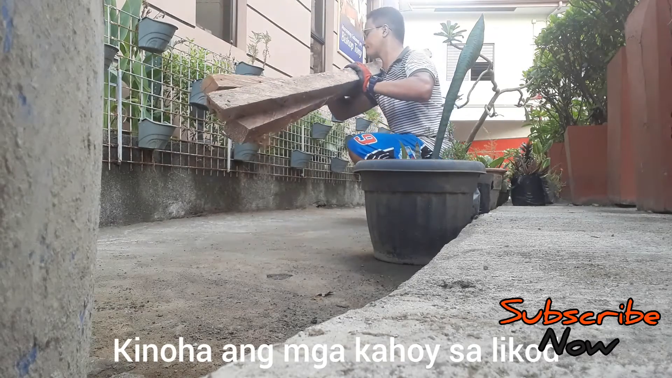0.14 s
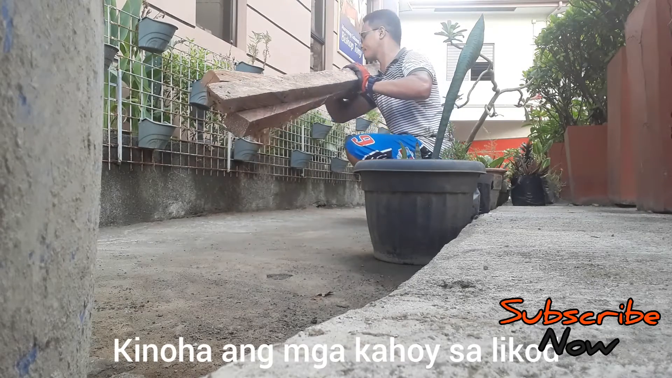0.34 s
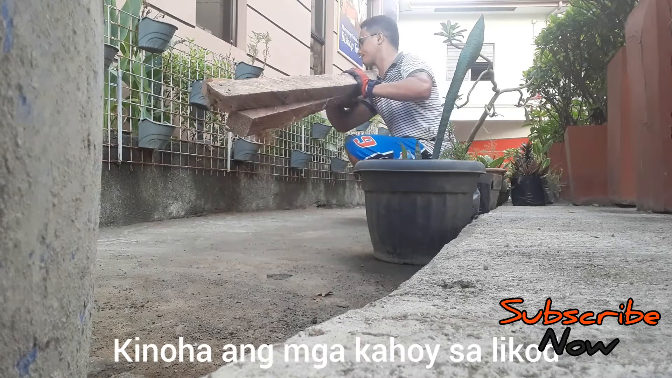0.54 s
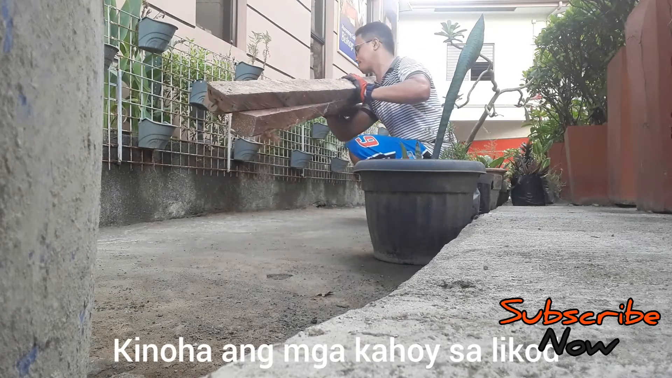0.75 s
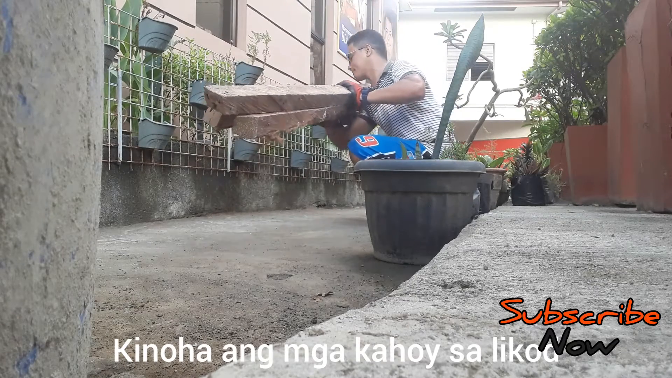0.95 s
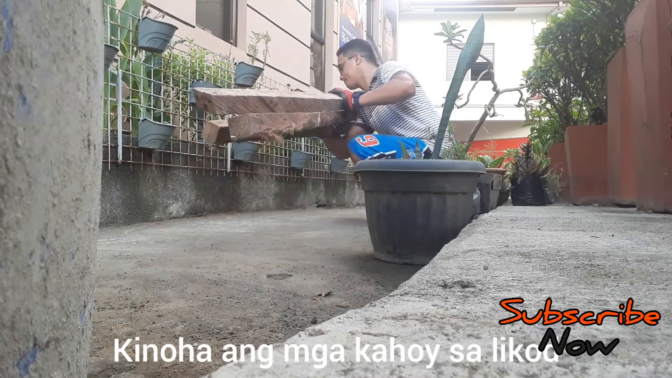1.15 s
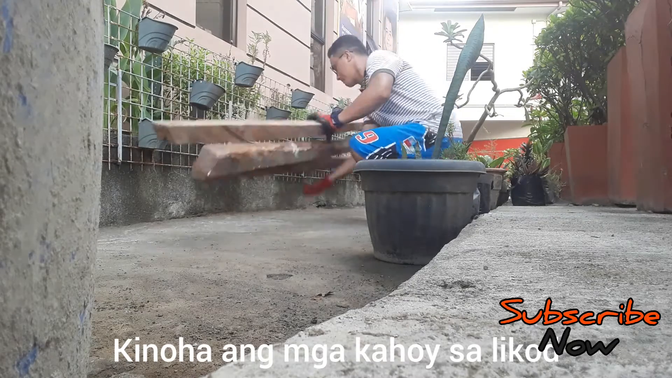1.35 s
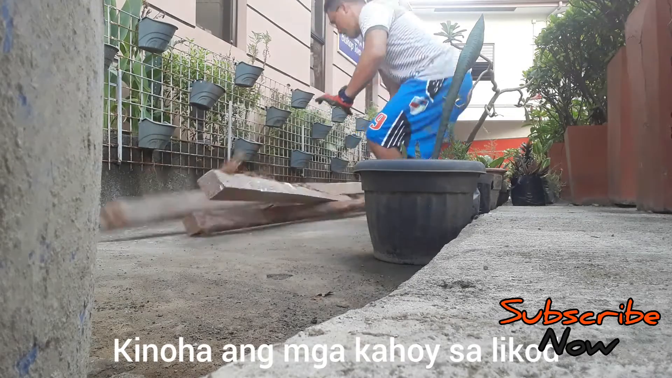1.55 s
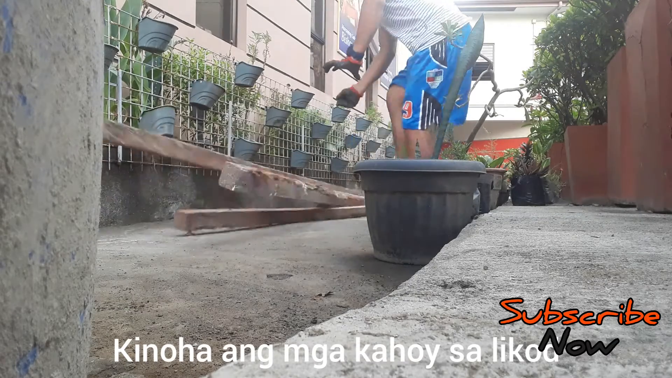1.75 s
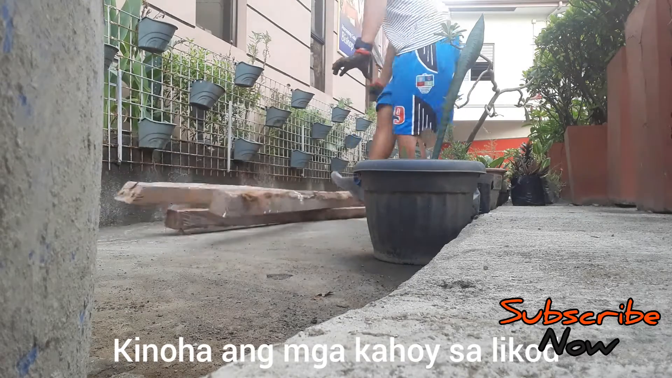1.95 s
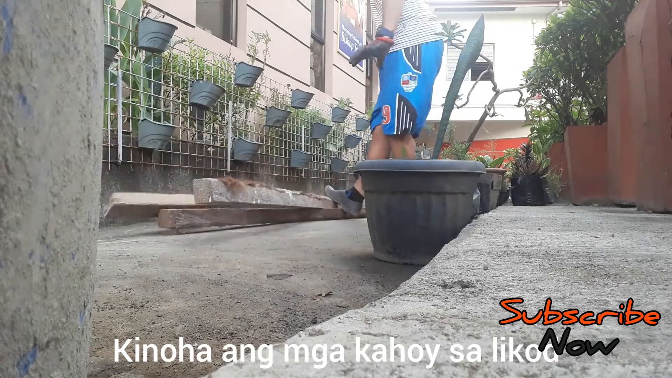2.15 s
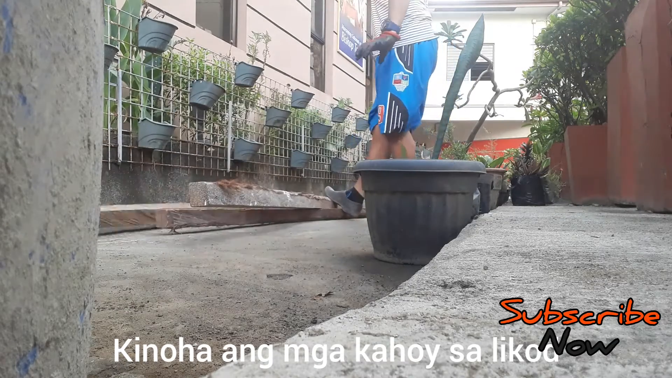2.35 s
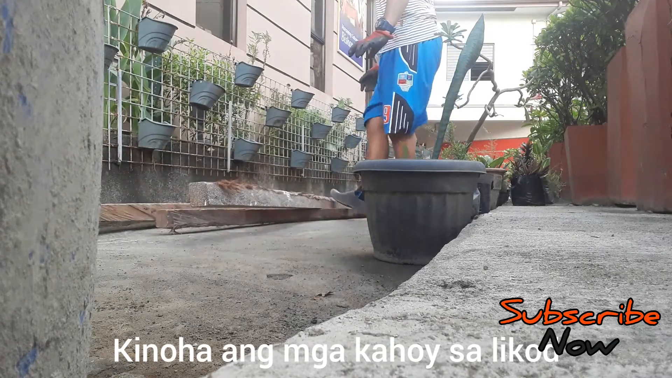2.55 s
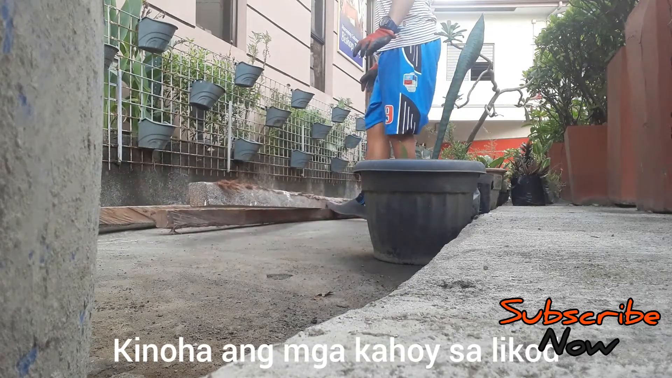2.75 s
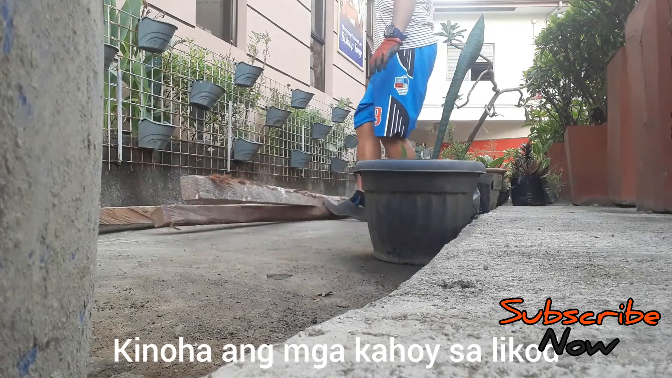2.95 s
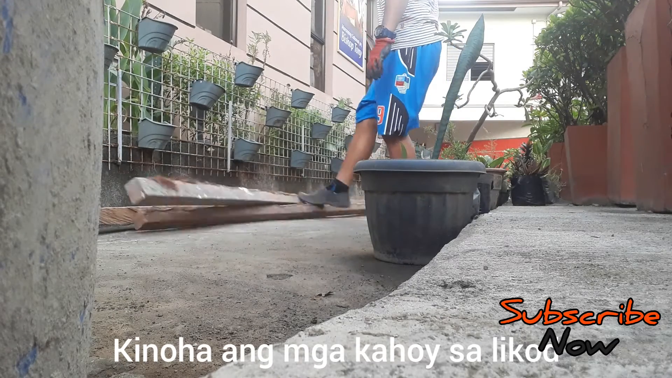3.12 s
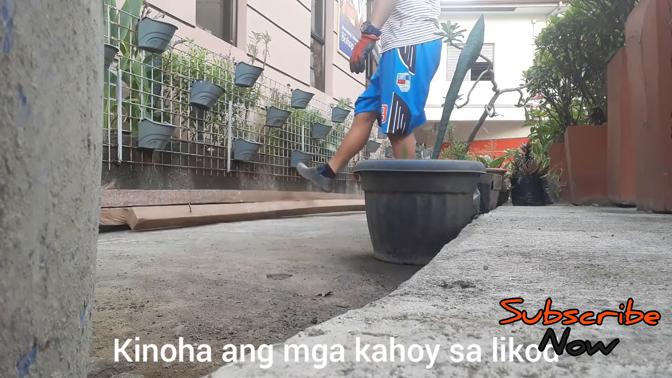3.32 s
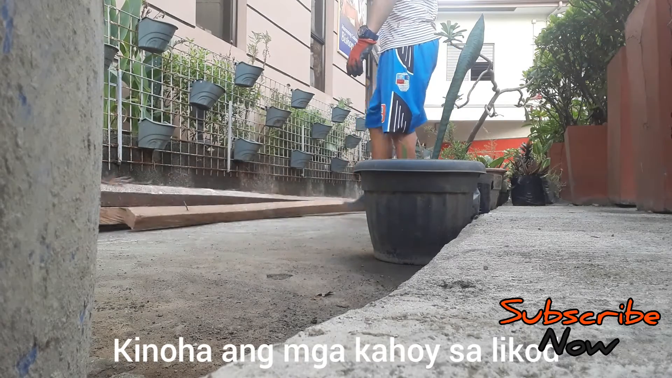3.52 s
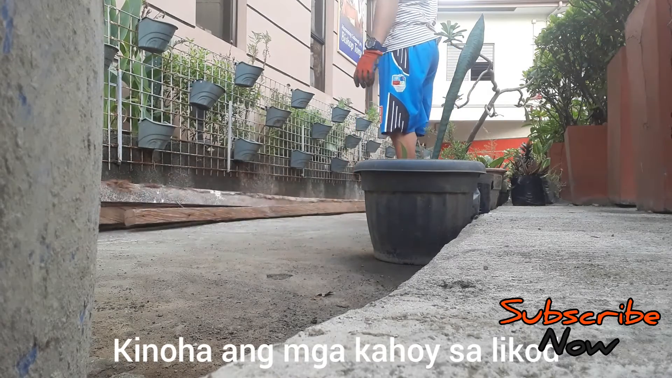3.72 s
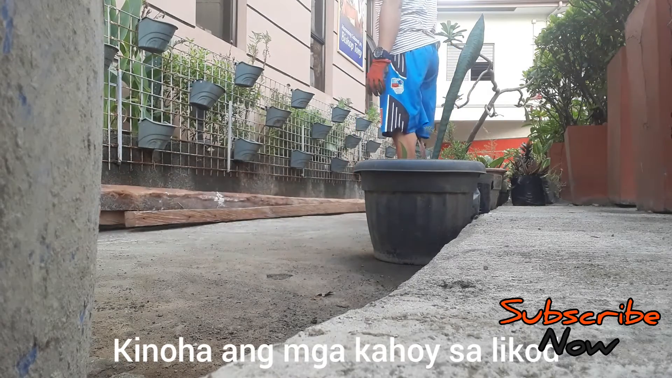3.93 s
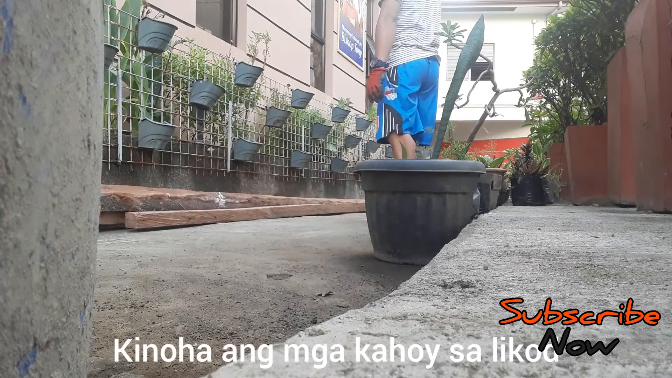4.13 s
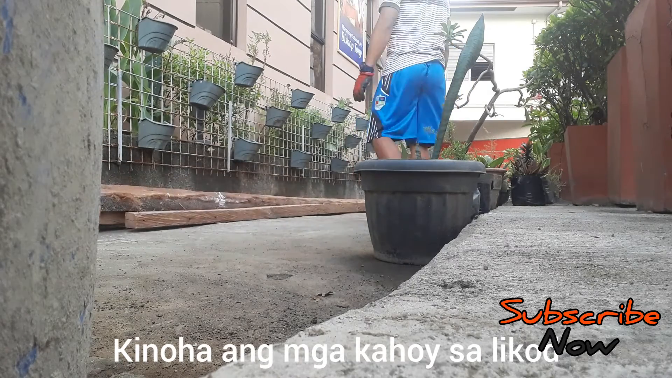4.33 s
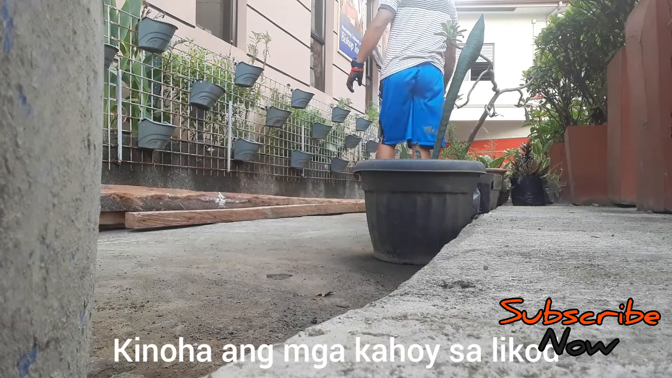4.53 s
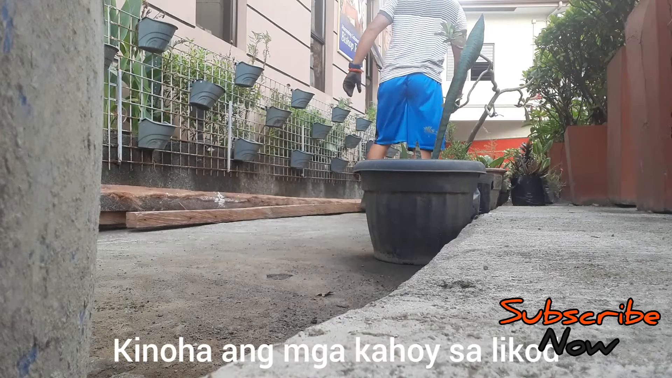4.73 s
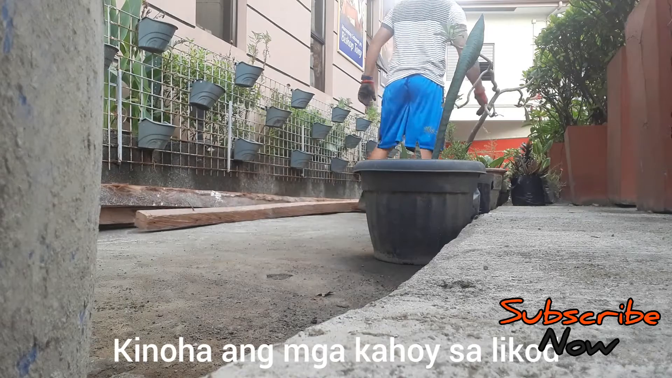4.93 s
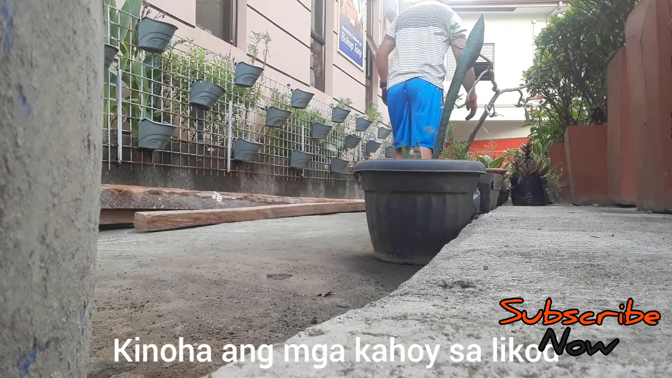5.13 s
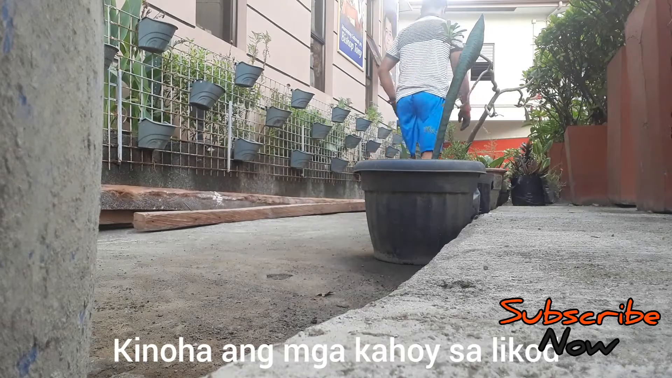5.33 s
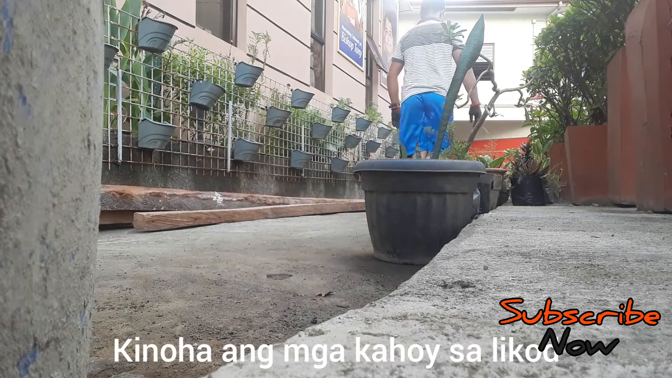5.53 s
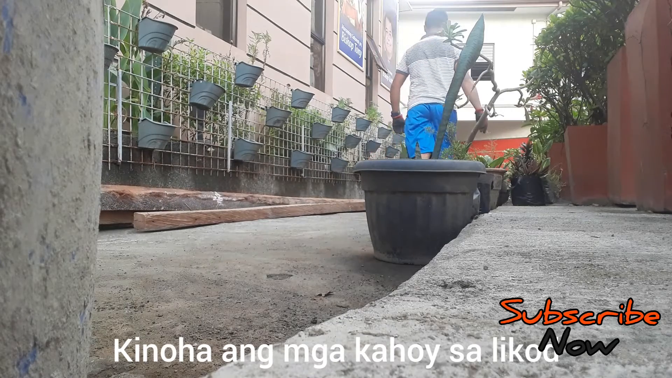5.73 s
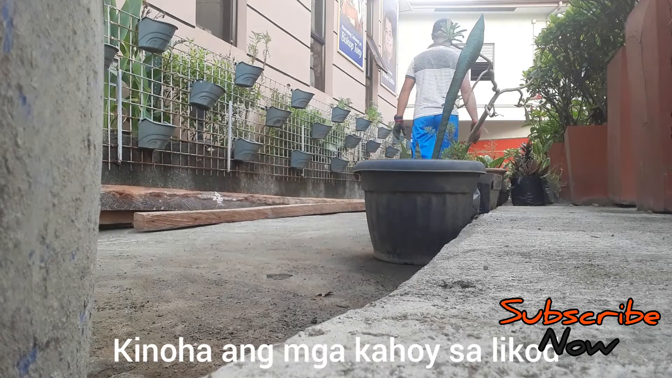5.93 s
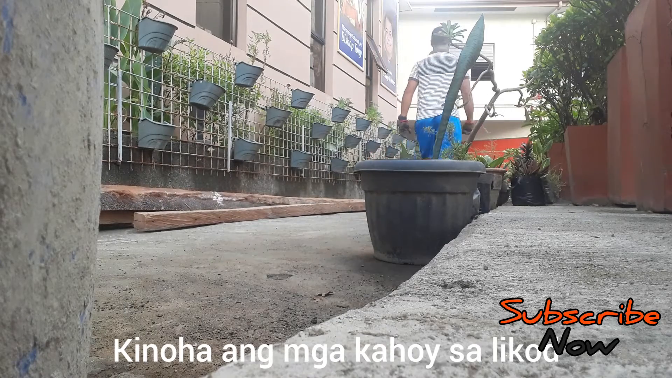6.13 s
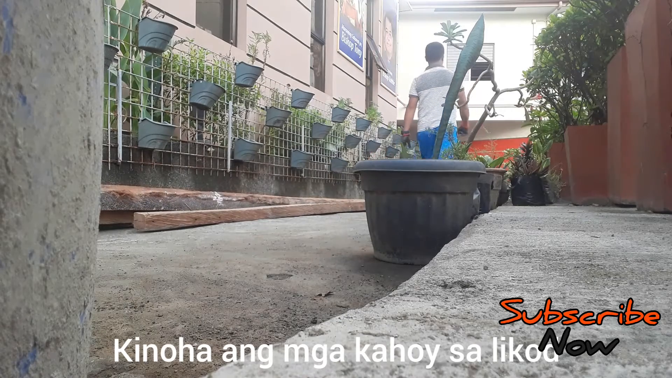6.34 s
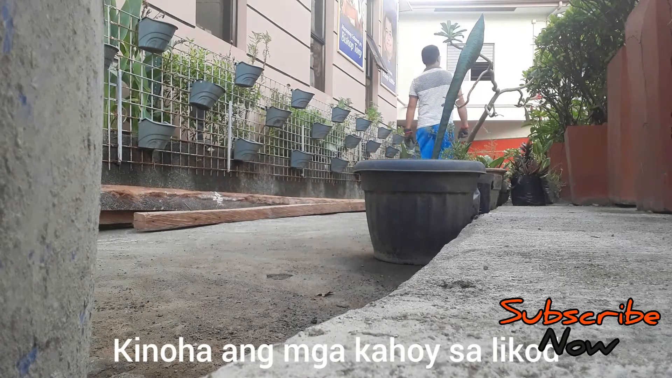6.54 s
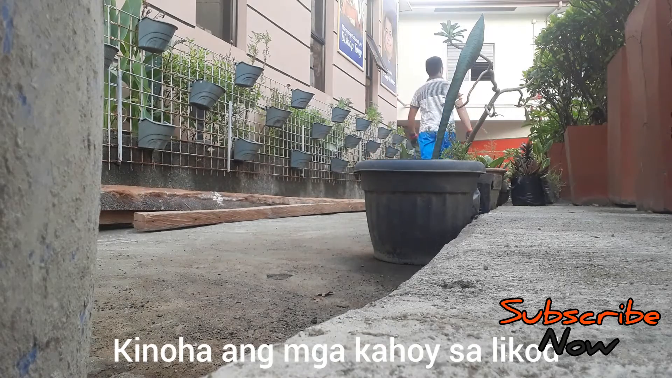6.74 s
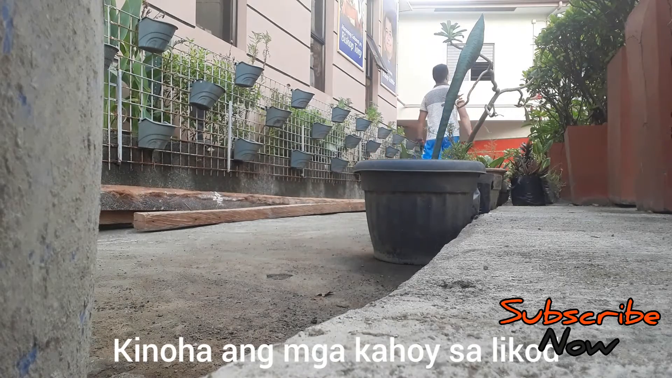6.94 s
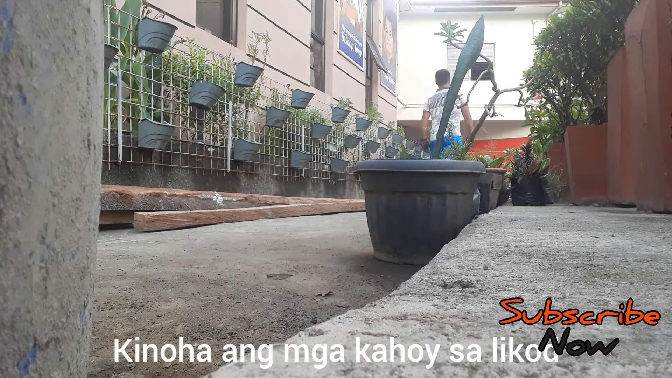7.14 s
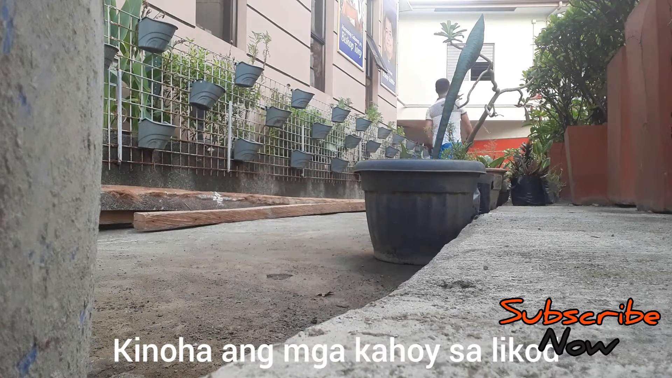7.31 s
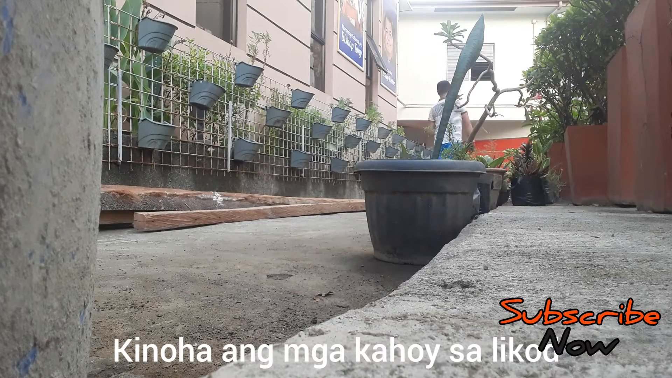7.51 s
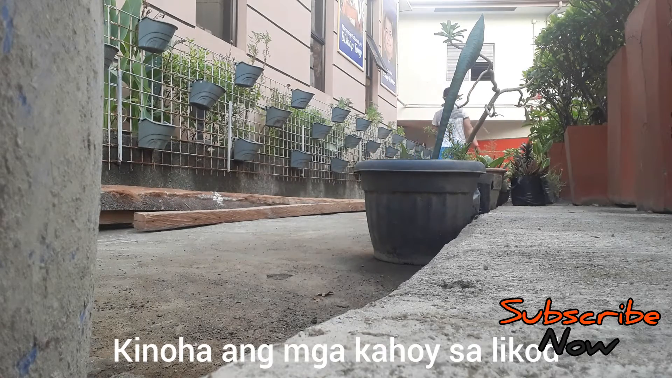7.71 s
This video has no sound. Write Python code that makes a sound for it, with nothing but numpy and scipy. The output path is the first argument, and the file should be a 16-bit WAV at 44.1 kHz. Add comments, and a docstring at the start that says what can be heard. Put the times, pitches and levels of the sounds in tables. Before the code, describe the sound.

For the first 1.4 s there is only a low outdoor murmur, a faint wavering hum near 157 Hz and slight treble hiss and grit. At 1.5-1.7 s wooden planks drop on concrete: a very loud cluster of thuds and bright cracks with a low puff of air and crunching sand. Separate knocks and bounces follow until 2.35 s, fading to small ticks by 2.8 s. From 3.13 to 3.6 s a foot shoves the stack: rapid, dry, mid-pitched knocks, two tiny rough squeaks around 3.25 s and grit. More knocks and a sandy slip at 3.7-3.8 s die by 4 s. At 4.75-5.05 s a hollow object judders and scrapes, quieter, with weaker catches until 5.45 s. Then faint grit, hum returning near 6.3 s, a very faint falling chirp at 7.07 s, and murmur to the end. Short ring from close walls.

```python
"""In a narrow garden passage, wooden planks drop on concrete, bounce and settle; a foot shoves them again.
Struck wood is sums of decaying modes; sand slides under it and two planks squeak as a rough sine.
Then something hollow judders over the floor: modal knocks plus clicks that rattle its body and grind sand.
Grit and a swelling treble hiss are filtered clicks, a faint falling chirp is a swept sine, the walls ring
briefly, and behind it all lie a rumble of coloured noise and a low wavering hum of three harmonics."""
import sys
import numpy as np
from scipy import signal
from scipy.fft import rfft, irfft
from scipy.io import wavfile

SR = 44100
rng = np.random.default_rng(int(sys.argv[2]) if len(sys.argv) > 2 else 0)


def persist_wave(psi):
    """Save psi, clipped to +-1, as 16-bit WAV."""
    counts = np.round(np.clip(psi, -1, 1) * 32767).astype(np.int16)
    wavfile.write(sys.argv[1], SR, np.atleast_2d(counts).T)


N = 342657
TIME = np.arange(N) / SR

# edges of the thud, body, clack, crack and splinter registers of a blow: frequency [Hz]
REGISTER_EDGES = [130, 300, 620, 1080, 2250, 3800]


def amp(db):
    """Decibels to gain."""
    return 10 ** (np.asarray(db) / 20)


def unit(x):
    """Scales to rms 1."""
    return x / np.sqrt(np.mean(x ** 2) + 1e-20)


def read(points, hz):
    """Reads a table of (frequency, value) over log frequency."""
    f, value = np.transpose(points)
    return np.interp(np.log(hz + 1), np.log(f), value)


def level(curve):
    """Gain over the whole scene from rows of (time [s], level [dB]), silent outside them."""
    return amp(np.interp(TIME, *np.transpose(curve), left=-np.inf, right=-np.inf))


def add(mix, s, sound):
    """Mixes a sound in at time s."""
    part = mix[round(s * SR):][:len(sound)]
    part += sound[:len(part)]


def band(x, lo_hz, hi_hz, order=3):
    """Causal Butterworth band-pass."""
    edges_hz = [lo_hz, min(hi_hz, SR / 2 - 1)]
    return signal.sosfilt(signal.butter(order, edges_hz, 'band', fs=SR, output='sos'), x)


def colour(x, tone, size=4096):
    """Causal minimum-phase filter with the given spectrum."""
    hz = abs(np.fft.fftfreq(size, 1 / SR))
    log_gain = np.log(amp(np.maximum(read(tone, hz), -100)))
    # the Hilbert transform of the log gain supplies the minimum phase
    taps = np.fft.ifft(np.exp(np.conj(signal.hilbert(log_gain)))).real
    return signal.oaconvolve(x, taps[:size // 2])[:len(x)]


def drift(per_s):
    """Random wander of rms 1: noise that fades out above about per_s cycles a second."""
    keep = np.exp(-(np.fft.rfftfreq(N, 1 / SR) / per_s) ** 2)
    return unit(irfft(rfft(rng.standard_normal(N)) * keep, N))


def grains(count, per_s, spread_db):
    """Sparse clicks of very unequal size and random sign."""
    size = amp(spread_db * np.minimum(rng.exponential(1, count), 4))
    size *= rng.choice([-1, 1], count)
    return size * (rng.random(count) < per_s / SR)


def strokes(rows, attack_s, release_t60, slope_db_per_s=0):
    """Gain over the whole scene: each stroke rises, holds or leans for its length, then dies away."""
    out = np.zeros(N)
    for start, length, db in rows:
        t = np.maximum(TIME - start, 0)
        held_db = db + slope_db_per_s * np.minimum(t, length)
        release_db = -60 * np.maximum(t - length, 0) / release_t60
        out += np.minimum(t / attack_s, 1) * amp(held_db + release_db)
    return out


def passage(wet_db, build_s=0.0037):
    """Direct sound, then dense reflections between the walls, each band dying at its own speed."""
    # ring of the walls: (frequency [Hz], decay by 60 dB [s])
    wall_decay = [(150, 0.079), (450, 0.33), (1000, 0.22), (2500, 0.15), (7000, 0.23), (15000, 0.25)]
    taps = rng.standard_normal(SR // 2) * (rng.random(SR // 2) < 3000 / SR)
    hz, t, z = signal.stft(taps, SR, nperseg=256)
    decay = amp(-60 * t / read(wall_decay, hz)[:, None])
    tail = signal.istft(z * decay, SR, nperseg=256)[1]
    tail *= 1 - np.exp(-(np.arange(len(tail)) / SR / build_s) ** 2)  # reflections build up
    response = amp(wet_db) * tail / np.linalg.norm(tail)
    response[0] += 1  # direct sound
    return response


def outdoors(hum_hz=157, waver=0.01495, second_db=-14, third_db=-13, faint_db=-59):
    """Distant rumble of coloured noise, and a far motor whose three-harmonic hum wavers in pitch and level."""
    # spectrum of the murmur: (frequency [Hz], relative level per Hz [dB])
    air_tone = [(20, -32), (45, -24.5), (70, -14.5), (100, -7), (200, -4.5), (260, -8.5), (370, -14),
                (470, -13), (620, -22), (900, -22), (1250, -29.5), (1700, -29.5), (2600, -37), (4000, -42),
                (7000, -48.5), (15500, -52)]
    # fader of the murmur, before its random swells: (time [s], level [dB])
    air_fader = [(0, -42.5), (1.6, -42.5), (2.5, -49), (3.0, -47.5), (3.8, -40), (4.5, -45), (5.3, -41.5),
                 (5.8, -46), (6.6, -41.5), (7.77, -41)]
    # spells in which the hum comes forward: (start [s], length [s], relative level at the start [dB])
    hum_spells = [(0, 1, -45.5), (6.28, 1, -40.5), (7.6, 0.14, -40.5)]
    air = unit(colour(rng.standard_normal(N), air_tone))
    air *= level(air_fader) * amp(0.85 * drift(per_s=14.3))
    turn = 2 * np.pi * np.cumsum(hum_hz * (1 + waver * drift(per_s=11))) / SR
    hum = unit(np.sin(turn) + amp(second_db) * np.sin(2 * turn) + amp(third_db) * np.sin(3 * turn))
    swell = amp(faint_db) + strokes(hum_spells, attack_s=0.092, release_t60=1.9, slope_db_per_s=-8.5)
    return air + hum * swell * amp(2.4 * drift(per_s=15))


def grit(crunch_t60=0.055, crush_s=0.00073, snap_db=-6, hard_db=-30, size=350):
    """Sand grains burst in short clumps, brighter when crushed hard; a soft treble hiss swells in between."""
    # grit crushed on the concrete: (time [s], relative level [dB])
    crushes = [(0.451, -57), (1.402, -34), (1.581, -27), (1.605, -21), (1.778, -29), (1.987, -41),
               (2.018, -43), (2.138, -51.5), (2.179, -47.5), (2.51, -45), (2.587, -55), (2.682, -52.5),
               (2.818, -51.5), (2.883, -44), (3.15, -52), (3.217, -37.5), (3.293, -51), (3.316, -42),
               (3.39, -26.5), (3.468, -49), (3.482, -35.5), (3.539, -39.5), (3.631, -52), (3.797, -37),
               (3.947, -42.5), (3.971, -44.5), (4.627, -40.5), (4.645, -48.5), (5.213, -47.5), (5.845, -54),
               (5.979, -52.5), (6.084, -62), (6.223, -56.5), (6.937, -48.5), (7.275, -51.5)]
    # spells when a soft treble hiss comes forward: (start [s], length [s], relative level at the start [dB])
    hiss_spells = [(0, .23, -56.5), (.98, 0.77, -57.5), (1.335, 0.49, -52), (2.93, 0.34, -61),
                   (3.14, 0.34, -50), (3.6, 0.15, -56), (3.76, .06, -40.5), (3.93, 0.39, -54),
                   (4.45, 0.34, -60), (5.38, 0.051, -49), (5.88, 0.11, -61), (6.4, .07, -62),
                   (6.82, 0.15, -54), (7.19, 0.1, -55), (7.4, 0.056, -60)]
    # spectra of crunch and hiss: (frequency [Hz], relative level per Hz [dB])
    crunch_tone = [(300, -33.5), (1200, 8.5), (2200, 6.5), (4000, 1.5), (5500, 0.5), (8000, -3),
                   (9200, -1.5), (11500, -3.5), (13500, -37), (15800, -15.5)]
    hiss_tone = [(1000, -29), (2500, 1.5), (4500, 1.5), (7500, -1.5), (9000, 1), (12000, -1), (16000, -7)]

    swell = strokes(hiss_spells, attack_s=0.025, release_t60=0.2, slope_db_per_s=-6.5)
    hiss = unit(colour(grains(N, per_s=3600, spread_db=0.5), hiss_tone))
    out = swell * hiss * amp(-4.5 + 4.3 * drift(per_s=53))

    t = np.arange(SR // 5) / SR
    clump = amp(-60 * t / crunch_t60) * (1 - np.exp(-t / crush_s))
    for s, db in crushes:
        crunch = unit(colour(grains(len(t), per_s=10000, spread_db=2.0) * clump, crunch_tone))
        snap = unit(band(grains(len(t), per_s=7000, spread_db=3) * clump, 8500, 14000, order=2))
        crunch += amp(snap_db + .5 * min(db - hard_db, 0)) * snap  # lighter crushes snap less
        # equal energy to a burst of "size" samples
        add(out, s, amp(db) * crunch * np.sqrt(size / len(t)))
    return signal.oaconvolve(out, passage(wet_db=-7))[:N]


def ring(modes, clatter_db, clatter_t60, detune=0.0051, top_hz=6500, count=56):
    """One blow: lasting modes of chance weight, plus damped ones that vary with how the object rests."""
    t = np.arange(int(.55 * SR)) / SR
    # damped modes spread evenly over log frequency, the higher ones dying sooner
    place = (np.arange(count) + rng.random(count)) / count
    damped_hz = REGISTER_EDGES[0] * (top_hz / REGISTER_EDGES[0]) ** place
    damped = np.column_stack([damped_hz, np.full(count, clatter_db), clatter_t60 * 2 ** -place])
    hz, db, t60 = np.vstack([modes, damped]).T[:, :, None]
    shift, weight, side = rng.standard_normal((3, len(hz), 1))
    # a complex pole holds both pitch and decay
    pole = 2j * np.pi * hz * (1 + detune * shift) - np.log(1000) / t60
    size = np.sign(side) * amp(db + 3 * weight)
    out = np.zeros(len(t))
    for p, a, last_s in zip(pole[:, 0], size[:, 0], t60[:, 0]):
        add(out, 0, a * np.exp(p * t[:int(last_s * SR)]).imag)
    return out


def favour(x, spot_hz, peak_db=-3, rest_db=-3, q=4):
    """The struck spot brings out the modes near one frequency."""
    peak = signal.lfilter(*signal.iirpeak(spot_hz, q, fs=SR), x)
    return amp(rest_db) * x + amp(peak_db) * peak


def contact(rows, thud_db, clack_db, crack_db, thud_slope, crack_slope, middling_db=-20):
    """Sets thud, clack and crack: harder contact is brighter, light blows thud more for their size."""
    s, db, hard, spot_hz = np.transpose(rows)
    thud = thud_db - thud_slope * (db - middling_db)
    return np.column_stack([s, db, thud, clack_db + hard, crack_db + crack_slope * hard, spot_hz])


def blows(rows, modes, room, clatter_db, clatter_t60, splinter_db, contact_s, resting_t60, size=800):
    """Each blow shares its energy between the registers: flat falls thud, edges clack and crack."""
    out = np.zeros(N)
    for s, db, thud, clack, crack, spot_hz in rows:
        hit = ring(modes, clatter_db, clatter_t60, detune=0.011)
        t = np.arange(len(hit)) / SR
        hit *= 1 - np.exp(-t / contact_s)  # the surfaces take a moment to meet
        hit *= amp(-60 * t / resting_t60)  # whatever it rests on damps it
        hit = signal.fftconvolve(hit, room)[:len(hit)]
        shares_db = (thud, 0, clack, crack, crack + splinter_db)
        orders = (4, 4, 4, 4, 2)
        blow = np.zeros(len(hit))
        for lo, hi, share_db, order in zip(REGISTER_EDGES, REGISTER_EDGES[1:], shares_db, orders):
            part = band(hit, lo, hi, order=order)
            # equal energy in each register before its share
            blow += amp(db + share_db) * part * np.sqrt(size) / np.linalg.norm(part)
        add(out, s - contact_s / 2, favour(blow, spot_hz))
    return out


def rebounds(rows, flight_s=.02, weaker_db=-10.5, softer_db=-3.5, spread=0.205):
    """After each blow the wood springs back and lands once more, weaker and softer."""
    s, db, hard, spot_hz = np.transpose(rows)
    delay_s = flight_s * np.exp(spread * rng.uniform(-0.97, 1, len(s)))
    return np.column_stack([s + delay_s, db + weaker_db, hard + softer_db, spot_hz])


def planks(room, push_db=-30, push_s=0.0051):
    """Modal blows of wood on wood and concrete; an early heavy landing also pushes a low puff of air."""
    # blows of wood: (time [s], relative strength [dB], hardness [dB], frequency the struck spot favours [Hz])
    # hardness above 0: an edge strikes; below 0: a flat face
    knocks = [(1.499, -29.5, -9, 285), (1.559, -9.5, -4.5, 446), (1.569, -8.5, 7, 370),
              (1.603, -11.5, 12.5, 1820), (1.641, -11.5, 7.5, 850), (1.667, -20.5, 11.5, 950),
              (1.687, -13.5, -26, 495), (1.735, -22, -3.5, 464), (1.778, -22, 4.5, 450),
              (1.877, -24, -5, 375), (1.904, -13.5, -7, 790), (1.996, -13, 1, 860), (2.095, -20, 1.5, 387),
              (2.191, -22, -4, 505), (2.261, -16.5, 4.5, 1204), (2.318, -24, -2, 380),
              (2.345, -29.5, -5, 502), (2.479, -33, 4, 750), (2.512, -46, 13.5, 750),
              (2.586, -50, 9.5, 770), (2.643, -34, 3, 470), (2.725, -30, 4, 776), (2.741, -26, -2.5, 740),
              (2.785, -35.5, -15, 496), (3.132, -35.5, 2.5, 349), (3.154, -30.5, 4.5, 430),
              (3.185, -12, 0, 370), (3.214, -14.5, -6.5, 460), (3.228, -10, -8, 530),
              (3.258, -21.5, -7, 550), (3.303, -14.5, -0.5, 403), (3.356, -11, 4.5, 816),
              (3.372, -11.5, -3, 816), (3.412, -14.5, -0.5, 620), (3.433, -12, 0, 860),
              (3.47, -12, -0.5, 790), (3.533, -14, -2.5, 520), (3.555, -12, -4.5, 780), (3.63, -24, 1, 250),
              (3.747, -12.5, -4.5, 434), (3.781, -14.5, 0.5, 306), (3.795, -31, 16, 1920),
              (3.824, -25.5, 2, 252), (3.902, -35, 8, 410), (3.925, -29.5, 5, 388), (3.965, -39, -5, 505)]
    # bending and twisting modes: (frequency [Hz], relative level [dB], decay by 60 dB before damping [s])
    plank_modes = [(159, -9, .22), (190.2, 7.5, 0.095), (242.7, -3.5, 0.46), (307, -29, 0.16),
                   (370.4, 4, 0.27), (410, -4.5, 0.28), (458.4, 7.5, 0.26), (499.4, 6, 0.33),
                   (570, -46.5, 0.16), (633, -5.5, 0.089), (773, 6, 0.27), (802.6, 10.5, 0.064),
                   (846.6, -5, 0.45), (936, 5, 0.093), (1052, 1.5, 0.074), (1022, -5.5, 0.062),
                   (1271, -4, 0.28), (1304, 3.5, 0.074), (1436, 5.5, 0.064), (1760, -11.5, 0.061),
                   (1808, -2.5, 0.19), (1982, 19, 0.019)]
    landings = contact(np.vstack([knocks, rebounds(knocks)]), thud_db=-7, clack_db=-4, crack_db=-17.0,
                       thud_slope=.35, crack_slope=1.27)
    out = blows(landings, plank_modes, room, clatter_db=5, clatter_t60=0.056, splinter_db=-15.5,
                contact_s=0.0035, resting_t60=0.41)
    u = np.arange(SR // 10) / SR / push_s
    add(out, 1.562, amp(push_db) * (1 - u) * np.exp(-u))  # puff: a push, then a slower pull
    return out


def slide(room, lo_hz=1900, hi_hz=3000):
    """Coarse sand rasps under the planks as they slip into place: band-passed clicks."""
    # plank ends press harder until they stop: (start [s], length [s], relative level at the start [dB])
    slips = [(2.725, 0.0073, -56), (3.705, 0.061, -53.5), (3.772, 0.039, -37)]
    rasp = unit(band(grains(N, per_s=500, spread_db=4), lo_hz, hi_hz, order=2))
    pressure = strokes(slips, attack_s=0.0059, release_t60=.08, slope_db_per_s=160)
    return signal.oaconvolve(pressure * rasp, room)[:N]


def squeak(room, hz=2060, jitter=0.056):
    """Two planks stick and slip on each other so fast that it makes a rough, short note."""
    # squeaks of wood on wood as the stack is shoved: (start [s], length [s], peak level before the room [dB])
    rubs = [(3.22, 0.01, -28), (3.259, 0.011, -26)]
    turn = 2 * np.pi * np.cumsum(hz * (1 + jitter * drift(per_s=294))) / SR
    grip = strokes(rubs, attack_s=.004, release_t60=.03)
    return signal.oaconvolve(grip * np.sin(turn), room)[:N]


def hollow_scrape(room, rub_db=-2, sand_db=-5):
    """Stick and slip: large slips knock the body, small ones rattle it and grind sand."""
    # large slips: (time [s], relative strength [dB], hardness [dB], frequency the struck spot favours [Hz])
    judders = [(4.757, -36.5, -8, 870), (4.78, -43.5, 5, 2660), (4.818, -31, 1.5, 1010),
               (4.827, -26.5, 5, 1020), (4.857, -29, 8, 960), (4.878, -20, 1.5, 2160),
               (4.916, -25.5, -2.5, 970), (4.928, -22, -3, 1030), (4.944, -24, 5, 1580),
               (4.984, -23.5, 3.5, 1600), (4.998, -26.5, 2.5, 1850), (5.012, -24.5, -8.5, 2000),
               (5.03, -29.5, 0, 900), (5.107, -33, -2.5, 1970), (5.211, -36.5, 1, 2070),
               (5.252, -50, 9, 910), (5.317, -30.5, -2, 930), (5.345, -33, -3, 2020),
               (5.381, -35.5, -2.5, 2680), (5.44, -39.5, -6.5, 805)]
    # modes of the hollow thing: (frequency [Hz], relative level [dB], decay by 60 dB when free [s])
    hollow_modes = [(202, 1.5, 0.23), (257, 4, 0.099), (417, -1, 0.14), (517, -2.5, 0.71), (728, 2, 0.19),
                    (882.5, 4, 0.21), (923, -0.5, 0.27), (1033, 2.5, 0.11), (1260, -21, 0.19),
                    (1360, -9, 0.22), (1430, -24, .13), (1494, -1, 0.13), (1870, -1.5, 0.1),
                    (2000, 4, 0.061), (2008, 9.5, 0.041), (2505, 4, 0.025), (2533, 9.5, 0.027)]
    # pushes that rub it along the floor: (start [s], length [s], relative level at the start [dB])
    pushes = [(4.812, 0.23, -27), (5.08, 0.061, -44), (5.26, 0.05, -42), (5.305, 0.04, -38.5),
              (5.45, 0.054, -50)]
    # spectrum of the ground sand: (frequency [Hz], relative level per Hz [dB])
    sand_tone = [(1000, -7), (2300, 2), (2900, 1), (3700, -22), (4500, -16.5), (6000, -16), (8000, -16.5),
                 (9500, -15.5), (11800, -17), (13000, -29), (16000, -28)]

    catches = contact(judders, thud_db=-9, clack_db=-2.5, crack_db=0.5, thud_slope=0.22, crack_slope=1.0)
    knocking = blows(catches, hollow_modes, room, clatter_db=-4, clatter_t60=0.088, splinter_db=-10,
                     contact_s=0.0016, resting_t60=1.5)

    pressed = np.array(hollow_modes) * [1, 1, .5]  # rubbing on the floor halves the ringing time
    body = band(ring(pressed, clatter_db=-4, clatter_t60=0.1), 200, 1900)
    rattle = unit(signal.oaconvolve(grains(N, per_s=400, spread_db=3), body)[:N])
    sand = unit(colour(grains(N, per_s=5000, spread_db=3), sand_tone))
    sand *= amp(4.2 * drift(per_s=53))  # sand lies in patches
    effort = strokes(pushes, attack_s=.018, release_t60=0.089, slope_db_per_s=-36)
    rubbing = effort * (amp(rub_db) * rattle + amp(sand_db) * sand)
    return knocking + signal.oaconvolve(rubbing, room)[:N]


def chirp(start_s=7.07, length_s=0.088, from_hz=4200, to_hz=3000, db=-59):
    """A faint falling chirp from far off: a fluttering swept sine that swells as it drops."""
    hz = np.linspace(from_hz, to_hz, int(length_s * SR))
    swell = signal.windows.tukey(len(hz), .4) * (from_hz / hz) ** 2
    flutter = 1 + 0.071 * drift(per_s=330)[:len(hz)]
    turn = 2 * np.pi * np.cumsum(hz * flutter) / SR
    out = np.zeros(N)
    add(out, start_s, amp(db) * np.sin(turn) * swell)
    return signal.oaconvolve(out, passage(wet_db=0))[:N]


def scene():
    """Sums all layers into one channel; wood, sand slides, squeaks and scrape share one wall ring."""
    room = passage(wet_db=-5)
    wood = planks(room) + slide(room)
    rest = hollow_scrape(room) + grit() + chirp() + outdoors() + squeak(room)
    return (wood + rest)[None]


def record(dry):
    """The loudest blows overload softly; then a steep low-pass limits the band to about 15.8 kHz."""
    squeezed = .98 * dry / (1 + dry ** 8) ** (1 / 8)
    low_pass = signal.firwin(511, 15830, window=("kaiser", 9), fs=SR)
    return signal.oaconvolve(squeezed, low_pass[None], "same")


dry = scene()
out = record(dry)
persist_wave(out)
```